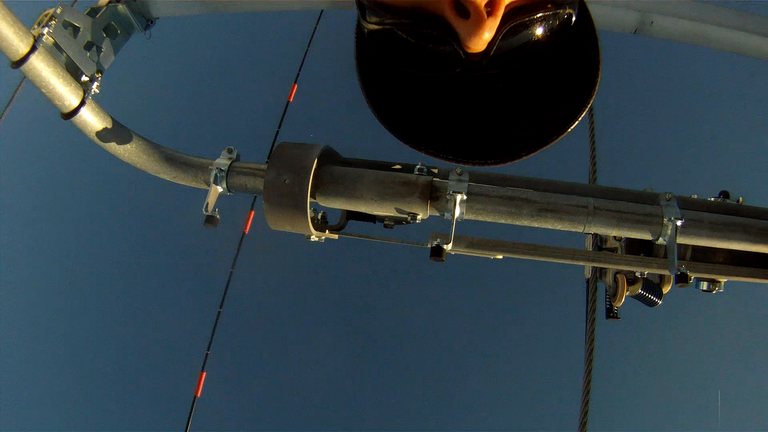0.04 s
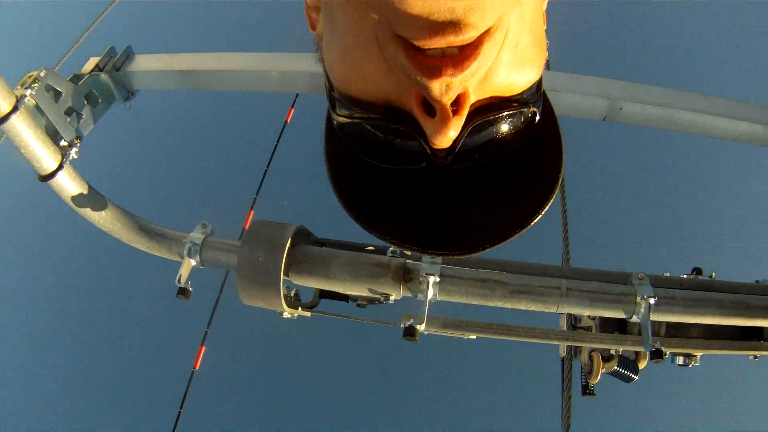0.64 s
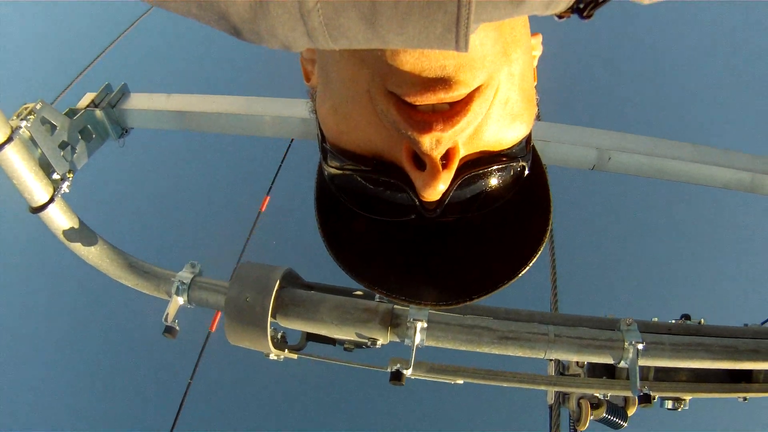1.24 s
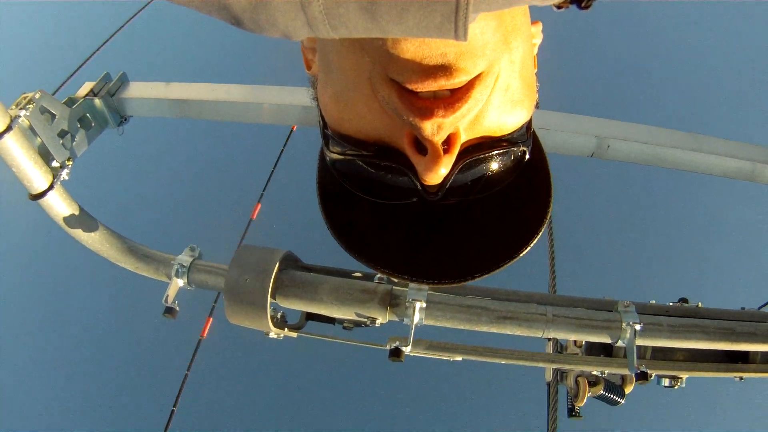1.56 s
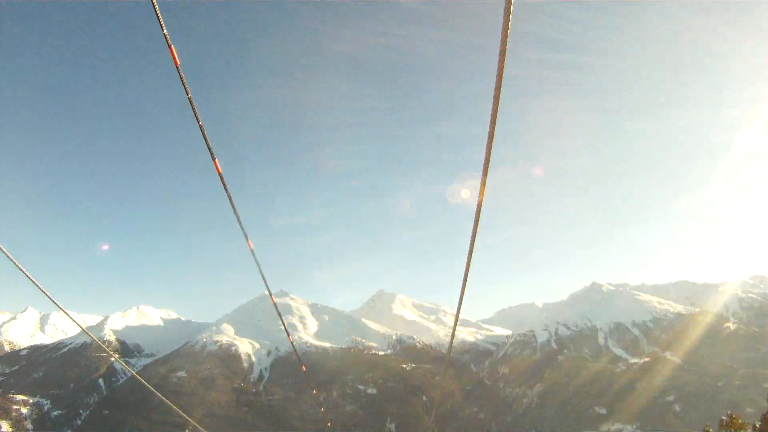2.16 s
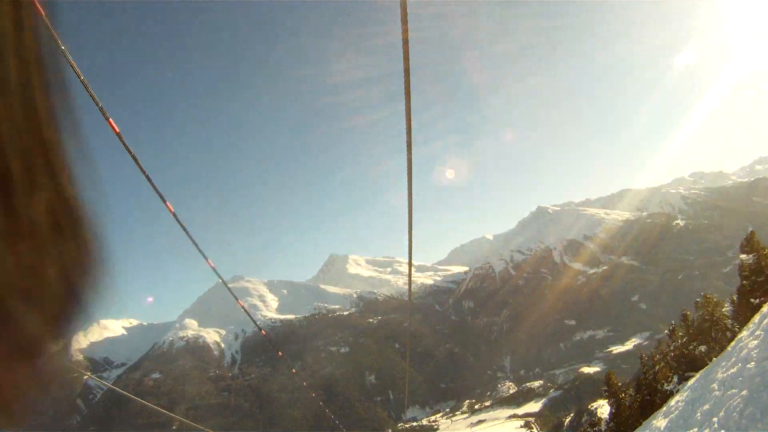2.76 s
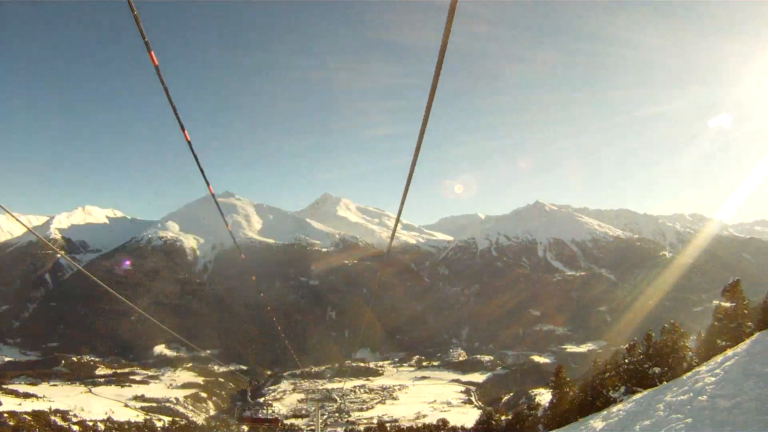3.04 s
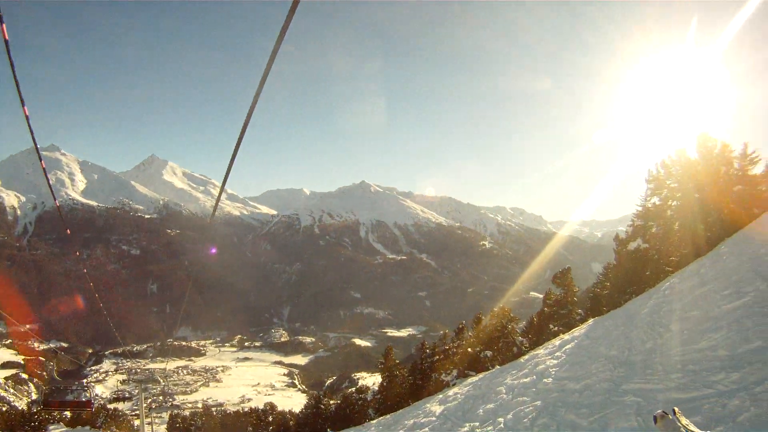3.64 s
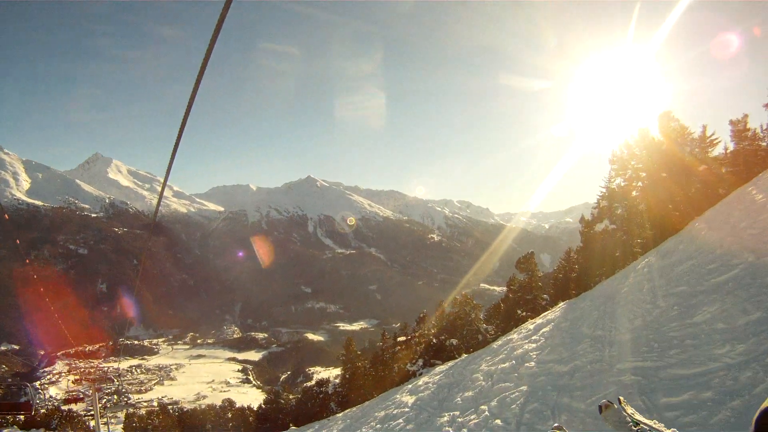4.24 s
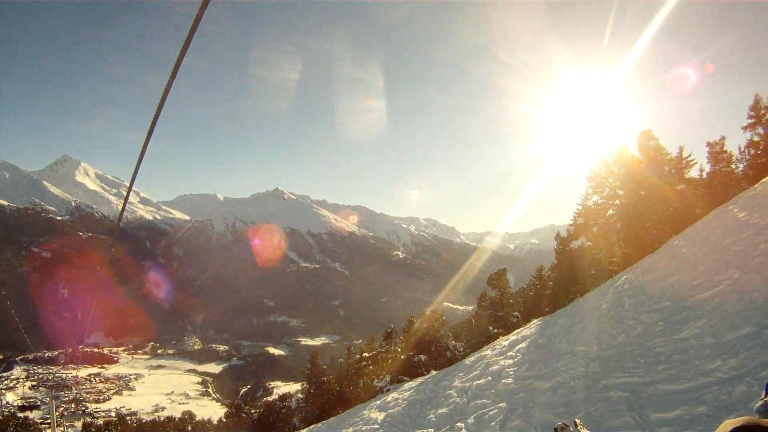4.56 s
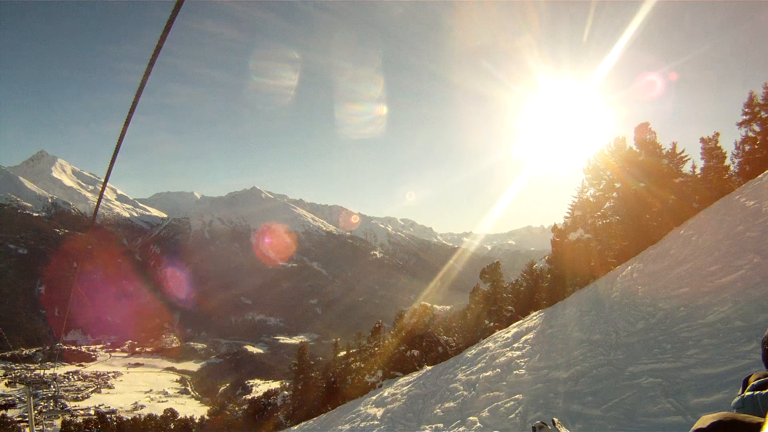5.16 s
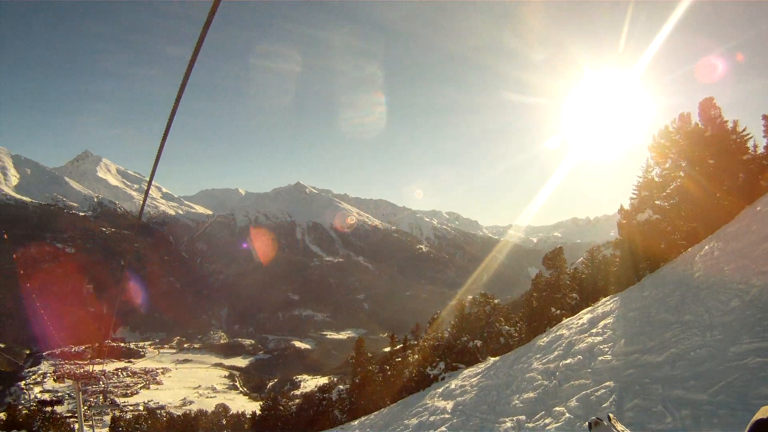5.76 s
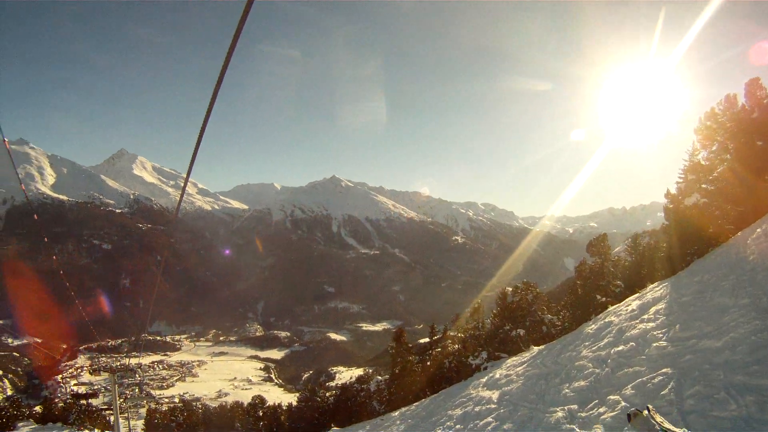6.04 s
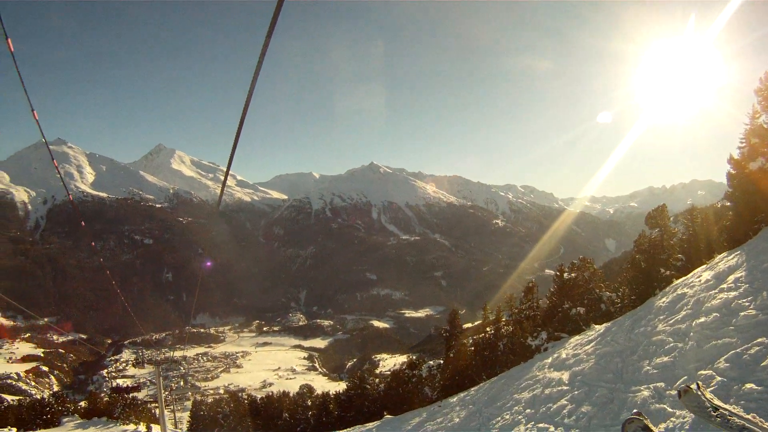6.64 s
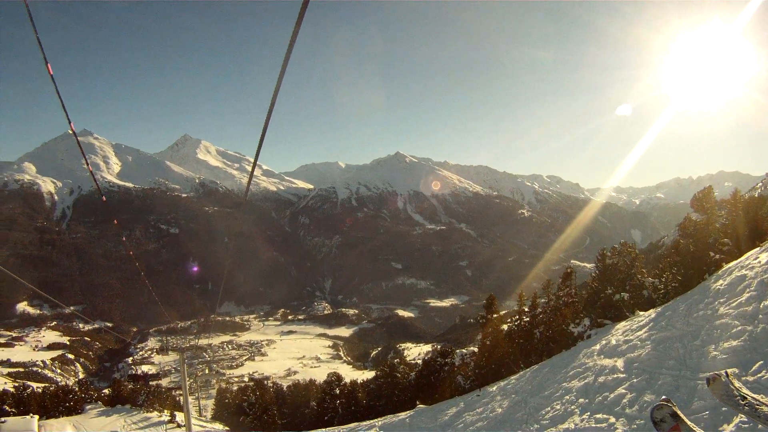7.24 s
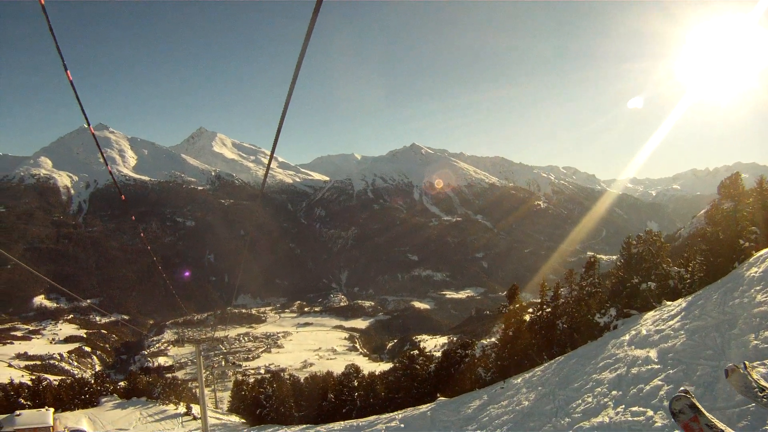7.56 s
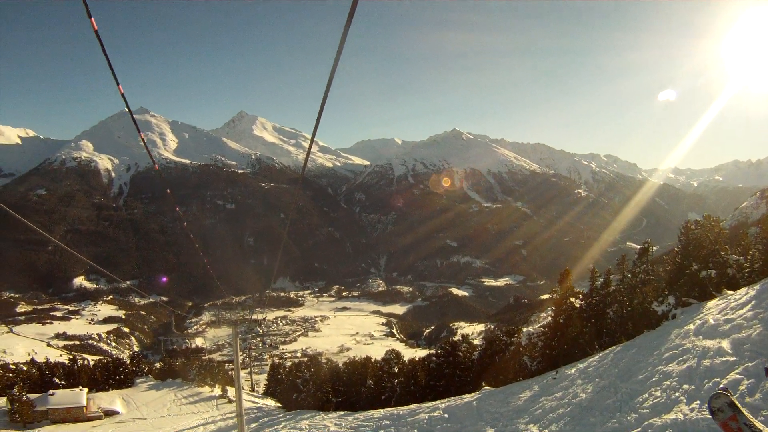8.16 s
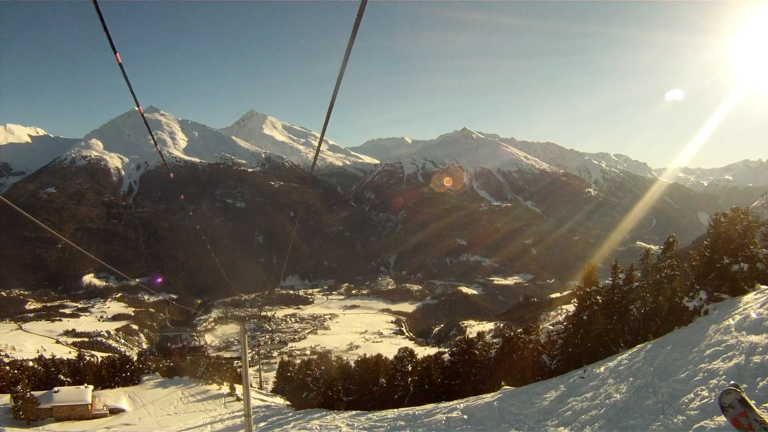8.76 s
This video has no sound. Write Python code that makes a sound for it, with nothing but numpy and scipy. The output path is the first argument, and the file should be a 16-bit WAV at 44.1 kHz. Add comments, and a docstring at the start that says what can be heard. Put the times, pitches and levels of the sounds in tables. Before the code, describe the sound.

Clothing rubs and scrapes over a small camera's plastic housing, with dull thuds, sharp mount clicks and a low wind rumble.

```python
"""On a chairlift above a snowy slope, a small camera in a plastic housing is swung round.
The open air rushes softly, and gusts buffet the microphone with a low rumble. The hand bumps the
housing with dull thuds, and the mount clicks as it takes the load. The main sound is clothing:
it rests on the housing and drags over it in strokes, its many tiny slips hissing and scraping."""
import sys
import numpy as np
from scipy import signal
from scipy.fft import rfft, irfft
from scipy.io import wavfile

SR = 44100
rng = np.random.default_rng(int(sys.argv[2]) if len(sys.argv) > 2 else 0)


def int16_out(signal):
    """Quantize to a 16-bit WAV file."""
    q = np.round(np.clip(np.atleast_2d(signal).T, -1, 1) * 32767)
    wavfile.write(sys.argv[1], SR, q.astype(np.int16))


N = 392490
TIME = np.arange(N) / SR
BINS = np.maximum(np.arange(8193) * SR / 16384, 1)  # frequencies for shaping a tone, in Hz

# tone of the open air: f/Hz, level/dB
AIR_TONE = [(210, -30), (350, -7.5), (688, -5.5), (844, -8), (1970, -16), (6030, -27.5), (15000, -37)]
# tone of wind hitting the microphone: f/Hz, level/dB
WIND_TONE = [(8.8, -52.5), (15, 5.5), (32, -1), (48, -1.5), (68, -2.5), (134, -20), (220, -33.5),
             (290, -35.5), (480, -120)]
# gusts on the microphone: t/s, level/dB
WIND_GUSTS = [(.07, -39), (.55, -56), (1.06, -47.5), (1.55, -57.5), (2.17, -33), (2.56, -39.5), (3.15, -38),
              (3.8, -33.5), (4.0, -46), (4.6, -38.5), (4.8, -46), (5.5, -46), (5.97, -44.5), (6.34, -51.5),
              (6.66, -44), (6.9, -47.5), (8.0, -48.5), (8.6, -52)]
# bumps of the hand: t/s, peak/dB, starting pitch/Hz
HAND_BUMPS = [(0.128, -22, 48.3), (.191, -7, 103), (.213, -20.5, 138), (1.83, -18, 257), (2.173, -21, 132),
              (2.853, -25, 200), (2.963, -8, 201), (2.9752, -11.5, 167), (3.837, -15, 152),
              (4.072, -27, 89), (4.579, -23, 129), (4.878, -22, 161), (4.903, -28, 51.5),
              (5.032, -24.5, 119), (5.536, -28.5, 94), (5.738, -33, 101)]
# notes at which the housing rings: f/Hz, width/Hz, level/dB
HOUSING_NOTES = [(514, 580, 1.5), (994, 100, 2.5), (1260, 274, 5.5), (1600, 300, 5.5), (1945, 340, 2.5),
                 (2264, 246, 5), (2650, 150, -4.5), (3430, 560, -5.5), (4800, 1300, -28.5),
                 (7150, 890, -25), (8530, 820, -15.5), (9730, 176, -8), (10190, 1400, -15),
                 (12400, 320, -19), (13700, 910, -15.5)]
# clicks of the mount: t/s, first tap's peak/dB, treble boost/dB, low-note boost/dB, jolt's peak/dB
MOUNT_CLICKS = [(0.1049, -9, 3, 4, -33), (0.1916, -19, -17, 4, -55), (.537, -24.5, 13, 0, -58),
                (1.677, -28, 6.5, 1, -38), (2.499, -18, 9.5, -4, -31), (3.009, -4.5, 0, -2.5, -22.5),
                (3.086, -9.5, -3, 4, -26), (4.069, -21, 6, -4, -41), (4.1378, -9.5, 8, -1.5, -38),
                (4.581, -20, 15, 2, -29), (4.879, -28, 7, 11, -22), (5.033, -23, 1.5, -3, -61),
                (5.332, -39, 15, -4, -58), (5.471, -31, 6, -4, -50), (5.536, -31.5, 5, 0, -46),
                (5.567, -37, 10, -8, -37), (6.814, -38, 3, -5, -45), (7.237, -29, 6, -2, -33.5),
                (7.355, -22, 7.5, -6.5, -42), (7.399, -30, 3, 6, -34), (7.481, -26, 8, 7, -32.5),
                (7.558, -39.5, 5, -7, -55), (7.653, -22.5, 3.5, 4, -32.5), (7.7099, -20.5, 2, 2, -32),
                (7.766, -15.5, 3, -1.5, -30), (7.876, -26, 0, 6, -34.5), (8.13, -18, -0.5, -0.5, -32),
                (8.2146, -15, -1.5, -1.5, -33.5), (8.239, -29, 5, 0, -33), (8.306, -34, 2, -3, -36.5),
                (8.3902, -15.5, -0.5, -1.5, -33)]
# tone of the housing's drumming walls: f/Hz, level/dB
DRUM_TONE = [(59, -36.5), (100, -1.5), (215, 0), (371, -7.5), (419, -10), (465, -11.5), (600, -17),
             (780, -30.5), (1320, -120)]
# tone of the hollow inside the housing: f/Hz, level/dB
HOLLOW_TONE = [(640, -23.5), (1080, -7.5), (1240, -6.5), (1410, -9.5), (1750, -8), (1960, -4), (2280, -4.5),
               (2500, -13.5), (3250, -23.5), (5500, -120)]
# tone of the rubbed housing's hiss: f/Hz, level/dB
HISS_TONE = [(1710, -28.5), (2900, -4), (3660, -3.5), (4610, -14), (5570, -16.5), (6010, -35.5),
             (6410, -16), (7320, -15.5), (8360, -7), (9290, -9.5), (10100, -5.5), (11700, -27),
             (12400, -47), (13800, -5.5), (15500, -17.5)]
# cloth resting on the housing: t/s, level/dB, drumming/dB (relative to the level)
RESTING_CLOTH = [(.07, -43.5, -2), (.26, -44, -4.5), (.57, -51, -1), (1.1, -50, 0.5), (1.42, -65, 4),
                 (1.7, -61.5, 0), (1.755, -33.5, -14.5), (2.3, -36, -5.5), (2.48, -43, -2),
                 (2.95, -38.5, -13), (3.86, -30.5, -4), (3.93, -45.5, -10.5), (4.66, -45.5, -2.5),
                 (4.78, -54.5, -12), (5.7, -64, -2.5), (6.05, -62, -6.5), (8.2, -65, -3), (8.55, -74.5, 5)]
# strokes of cloth over the housing; the later dB columns are relative to the level:
# t/s, hold/s, level/dB, hiss/dB, drumming/dB, scrape pitch/Hz, scrape/dB, rasp pitch/Hz, rasp/dB
CLOTH_STROKES = [(.072, .005, -37.5, -1, -17, 2300, 3, 1200, -21),
                 (0.181, 0.013, -33, 0.5, -21, 1750, -7, 768, -13.5),
                 (0.293, 0.13, -42, -3.5, -3.5, 1238, -3.5, 746, -13),
                 (0.639, 0.42, -47.5, -36, 1, 1211, -3, 743, -10),
                 (0.993, 0.011, -37, -10, 0, 1890, -12, 798, -19),
                 (1.767, 0.049, -31.5, 2, -11.5, 3504, -0.5, 1041, -6),
                 (1.848, 0.035, -35.5, 3.5, -38, 3830, -0.5, 1010, -2.5),
                 (2.007, 0.017, -34.5, 6, -2, 3410, -4, 1000, -4.5),
                 (2.111, 0.09, -33.5, 2.5, -4.5, 2245, 3, 992, -17),
                 (2.529, 0.035, -40, -0.5, -4, 2020, -4, 1100, -12),
                 (2.613, 0.046, -33.5, -1.5, -30, 2340, -1.5, 1092, -12),
                 (2.725, 0.022, -35.5, -1.5, -4, 1140, -18, 722, -10),
                 (3.006, 0.15, -37.5, -4.5, 4, 1215, -3.5, 330, -3),
                 (3.172, 0.046, -24.5, 3, -15.5, 3560, 0.5, 1896, 0),
                 (3.276, 0.13, -31, -2.5, -16, 3540, -4.5, 1240, -10),
                 (3.43, 0.11, -29.5, -0.5, -2, 3485, -3, 1300, -7),
                 (3.599, 0.035, -25.5, -3, 0.5, 1709, -5, 808, -12.5),
                 (3.744, 0.077, -36.5, -4, 0, 1686, -2.5, 813, -8.5),
                 (4.035, 0.16, -52, 7.5, -29, 2240, 0, 1090, -6),
                 (4.424, 0.066, -37.5, -1, -12.5, 2130, -3, 1105, -3.5),
                 (4.527, 0.04, -34, -1.5, -18, 2180, -3.5, 1120, -6.5),
                 (4.862, 0.048, -37, -4.5, -10.5, 2140, -10, 1090, -11),
                 (4.994, 0.0041, -47.5, -2.5, -3, 2050, -1, 1080, -12),
                 (5.098, 0.047, -56, 1.5, -17, 2110, 1, 1100, -21),
                 (5.866, 0.086, -53, 4, -2, 2050, 1, 1214, -2),
                 (6.595, 0.086, -59.5, 4.5, -9, 2000, -10, 1190, -2),
                 (7.756, 0.14, -57.5, 2, -3, 1990, -4, 1224, -12),
                 (8.11, .11, -57.5, 1, -5, 2190, -12, 1176, -12)]


def undb(db):
    """Turn decibels into a number to multiply a sound by."""
    return 10 ** (np.asarray(db) / 20)


def unit(x):
    """Scale a signal to an average strength (rms) of 1."""
    return x / np.sqrt(np.mean(x ** 2))


def curves(table):
    """Join the values in each column of a table by straight lines in time."""
    times, *columns = np.transpose(table)
    return [np.interp(TIME, times, column) for column in columns]


def response(gain):
    """The ring after one sharp tap, given its strength at each frequency in BINS."""
    cepstrum = irfft(np.log(gain))
    half = len(cepstrum) // 2
    # folding onto the first half keeps the ring from starting before the tap
    cepstrum[1:half] *= 2
    cepstrum[half + 1:] = 0
    return irfft(np.exp(rfft(cepstrum)))


def colour(x, tone):
    """Shape x with a tone table; the result has strength 1."""
    hz, db = np.transpose(sorted(tone))
    gain = undb(np.interp(np.log(BINS), np.log(hz), db))
    return unit(signal.fftconvolve(x, response(gain))[:N])


def wander(rate):
    """A curve of strength 1 that heads for a new random value rate times a second."""
    points = rng.standard_normal(8192)
    return unit(np.interp(TIME * rate, np.arange(len(points)), points))


def slips(rate, spread_db):
    """Tiny random slips, about rate a second, a few much larger than the rest."""
    hits = rng.random(N) < rate / SR
    return hits * rng.choice([-1, 1], N) * undb(spread_db * np.minimum(rng.exponential(size=N), 4))


def add(track, s, sound):
    """Mix a short sound in, starting at s seconds."""
    start = int(s * SR)
    track[start:start + len(sound)] += sound[:N - start]


def open_air(level_db=-68, swell_db=1):
    """The soft, steady rush of the mountainside."""
    return colour(rng.standard_normal(N), AIR_TONE) * undb(level_db + swell_db * wander(2.84))


def wind(puff_db=3.0):
    """Swirls of air press on the microphone in puffs: a rumble that swells with each gust."""
    level_db, = curves(WIND_GUSTS)
    return colour(rng.standard_normal(N), WIND_TONE) * undb(level_db + puff_db * wander(12))


def hand_thuds(damping=2.64, slowing=0.33, rise_cycles=0.26):
    """A soft blow swings the housing to and fro about once, slowing as the hand gives way."""
    out, t = np.zeros(N), TIME[:4096]
    for s, db, hz in HAND_BUMPS:
        cycles = np.log1p(slowing * hz * t) / slowing
        rise = 1 - np.exp(-(cycles / rise_cycles) ** 2)
        swing = np.sin(2 * np.pi * cycles) * np.exp(-damping * hz * t) * rise
        add(out, s, undb(db) * swing / swing.max())
    return out


def housing_ring(treble_db, low_db, chances, treble_hz=3000, low_hz=1150):
    """The housing rings after a tap; where the tap lands decides how strong each note is."""
    power = 0
    for (hz, width_hz, db), chance in zip(HOUSING_NOTES, chances):
        gain = undb(db + treble_db * (hz > treble_hz) + low_db * (hz < low_hz) + 2 * chance)
        power += (gain / (1 + (2 * (BINS - hz) / width_hz) ** 2)) ** 2
    ring = response(np.sqrt(power))
    return ring / np.abs(ring).max()


def mount_clicks(rebound=0.5, rebound_s=0.00101, jolt_hz=48, jolt_s=0.016, rise_s=0.0001):
    """The mount slips and catches: a double tap rings the housing, and the jolt sways the air inside."""
    out, t = np.zeros(N), TIME[:4096]
    jolt = np.cos(2 * np.pi * jolt_hz * t) * np.exp(-t / jolt_s) * (1 - np.exp(-t / rise_s))
    for s, db, treble_db, low_db, jolt_db in MOUNT_CLICKS:
        chances = rng.uniform(-1.2, 1, len(HOUSING_NOTES))  # no two taps land alike
        tap = -undb(db) * housing_ring(treble_db, low_db, chances)
        add(out, s, tap)
        add(out, s + rebound_s * (1 + 0.046 * chances[0]), rebound * tap)
        add(out, s, -undb(jolt_db) * jolt / jolt.max())
    return out


def stroke(hold_s, attack_s=0.047, release_s=0.032):
    """The force of one stroke: the cloth takes hold, drags and lets go."""
    t = TIME[:SR]
    take_hold = np.sin(np.pi / 2 * np.minimum(t / attack_s, 1)) ** 2
    return take_hold * np.exp(-np.maximum(t - attack_s - hold_s, 0) / release_s)


def cloth_levels(dulling=0.24):
    """Strokes add to the resting cloth: gives the level, and hiss and drumming relative to it, in dB."""
    rest_db, rest_drum_db = curves(RESTING_CLOTH)
    rest_hiss_db = -2 - dulling * (rest_db - rest_db.mean())  # firmer contact sounds duller
    powers = undb([rest_db, rest_db + rest_hiss_db, rest_db + rest_drum_db]) ** 2
    for s, hold_s, db, hiss_db, drum_db, *_ in CLOTH_STROKES:
        for power, gain in zip(powers, undb([db, db + hiss_db, db + drum_db])):
            add(power, s, (gain * stroke(hold_s)) ** 2)
    level_db, hiss_db, drum_db = 10 * np.log10(powers)
    return level_db, hiss_db - level_db, drum_db - level_db


def friction(hz, width_hz, drift_share=.035, turns_per_s=22):
    """One second of rubbing noise around a pitch that drifts with the grip."""
    smoothing = signal.butter(2, max(width_hz / 2, 10), fs=SR, output="sos")
    slow_noise = signal.sosfilt(smoothing, rng.standard_normal(SR) + 1j * rng.standard_normal(SR))
    drift = np.interp(TIME[:SR] * turns_per_s, np.arange(256), rng.standard_normal(256))
    pitch_hz = hz * (1 + drift_share * drift)
    # move the slow noise up to that pitch
    return unit(np.real(slow_noise * np.exp(2j * np.pi * np.cumsum(pitch_hz) / SR)))


def cloth_scrapes(squeak_ratio=2.35, squeak_db_per_octave=18.5):
    """Where the cloth grips, its slips gather round one pitch, with a squeak above and a rasp below."""
    out = np.zeros(N)
    for s, hold_s, db, _, _, hz, scrape_db, rasp_hz, rasp_db in CLOTH_STROKES:
        width_hz = 0.14 * hz
        squeak_db = -10 + squeak_db_per_octave * np.log2(hz / 3330)  # lower scrapes squeak less
        scrape = friction(hz, width_hz)
        scrape += undb(squeak_db) * friction(squeak_ratio * hz, width_hz, drift_share=.015)
        rasp = friction(rasp_hz, width_hz=0.3 * rasp_hz)
        add(out, s, undb(db) * stroke(hold_s) * (undb(scrape_db) * scrape + undb(rasp_db) * rasp))
    return out


def cloth_brushing(flutter_db=2.0, chatter_db=1.29, drum_flutter_db=2.5, snag_db=-12, drowning=0.55,
                   sheen_hz=6000, sheen_db=-4.5, sheen_evenness=0.48):
    """Countless slips make the housing sound; their force flutters, and now and then a fibre snags."""
    level_db, hiss_db, drum_db = cloth_levels()
    flutter = undb(flutter_db * wander(35) + chatter_db * wander(320))
    # single snags stand out in light contact and drown in a hard stroke
    snags = unit(slips(110, 2.4)) * undb(snag_db - drowning * (level_db - level_db.mean()))
    hollow = colour(unit(slips(9000, 0.87)) + snags, HOLLOW_TONE)
    hiss = colour(unit(slips(14000, 3.1)) + snags, HISS_TONE)
    # the sheen, the highest hiss, varies less from stroke to stroke than the rest
    sheen = signal.sosfiltfilt(signal.butter(4, sheen_hz, "highpass", fs=SR, output="sos"), hiss)
    hiss += (undb(sheen_db - sheen_evenness * hiss_db) - 1) * sheen
    # coarser slips drum on the walls
    drumming = colour(slips(1500, 1.7), DRUM_TONE) * undb(drum_flutter_db * wander(45))
    rubbing = undb(level_db) * (hollow + undb(hiss_db) * hiss + undb(drum_db) * drumming)
    return flutter * (rubbing + cloth_scrapes())


def scene():
    """Everything reaches one microphone inside the housing; there is no echo."""
    return (cloth_brushing() + wind() + mount_clicks() + hand_thuds() + open_air())[None]


def record(dry, start_s=.069, fade_s=.003, top_hz=15450):
    """The sound comes in after a moment of silence; the camera cuts the highest treble."""
    fade_in = np.clip((TIME - start_s) / fade_s, 0, 1)
    treble_cut = signal.ellip(10, .2, 70, top_hz, fs=SR, output="sos")
    return signal.sosfilt(treble_cut, dry * fade_in)


dry = scene()
out = record(dry)
int16_out(out)
```